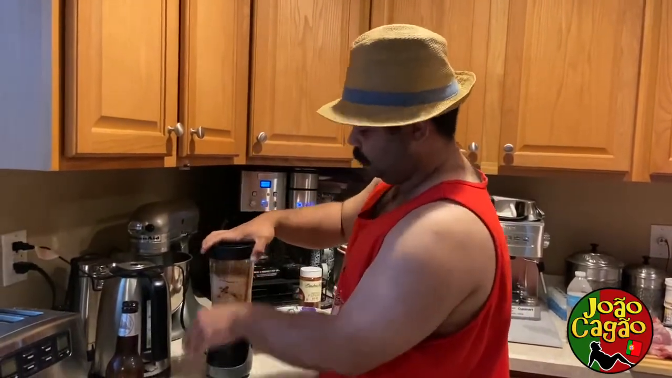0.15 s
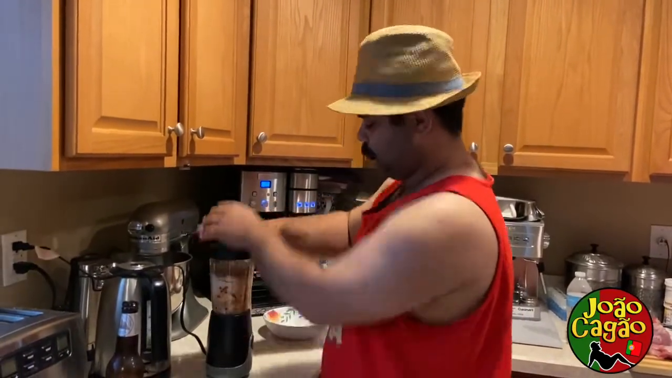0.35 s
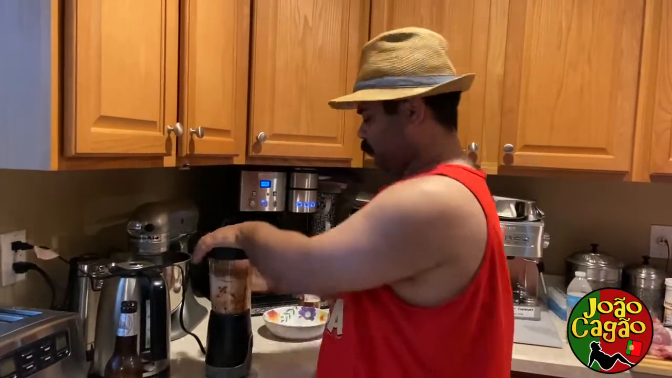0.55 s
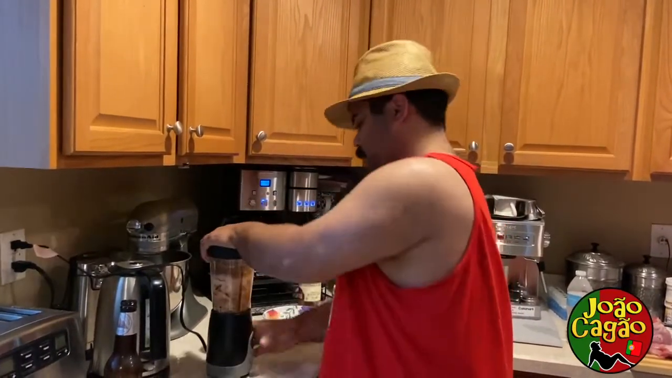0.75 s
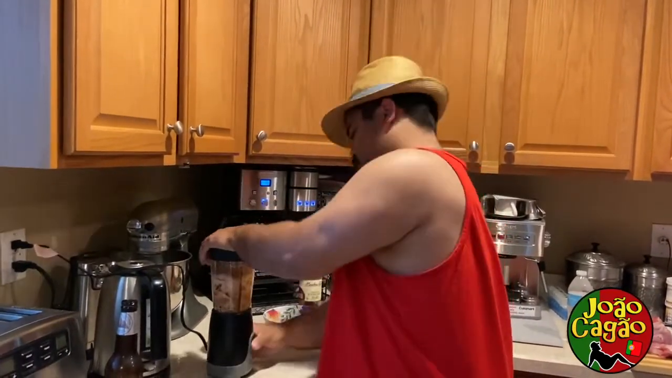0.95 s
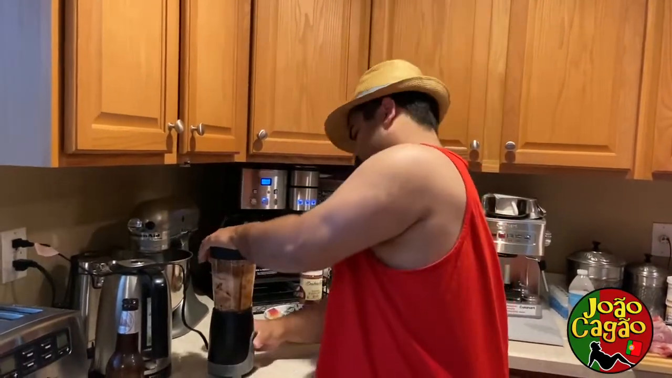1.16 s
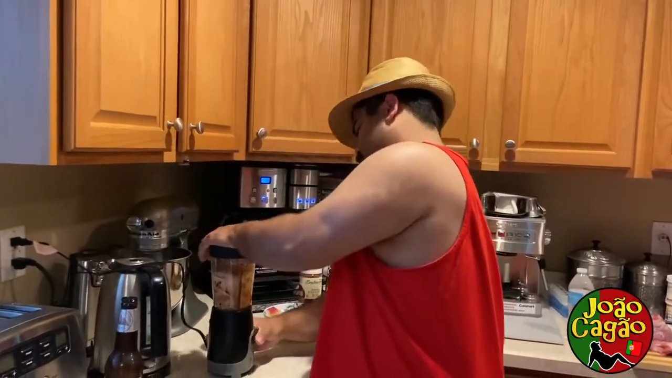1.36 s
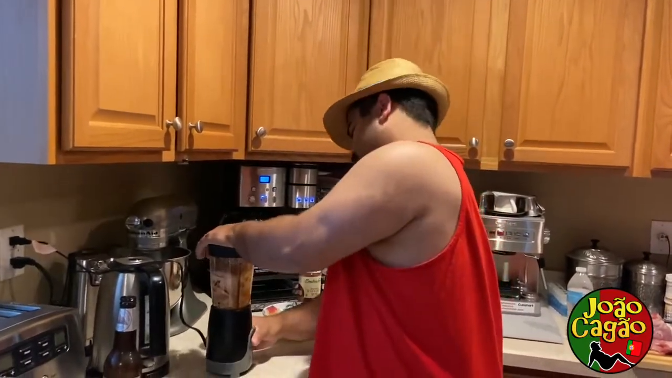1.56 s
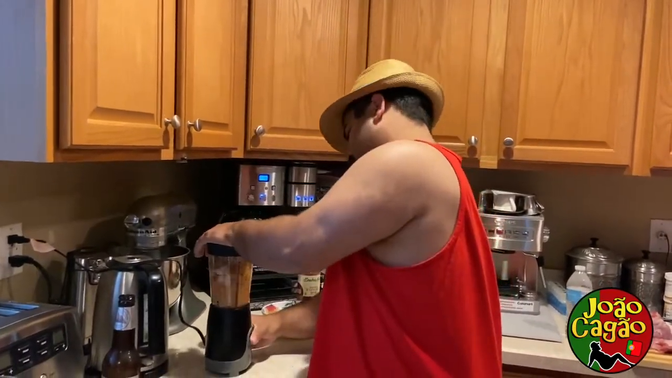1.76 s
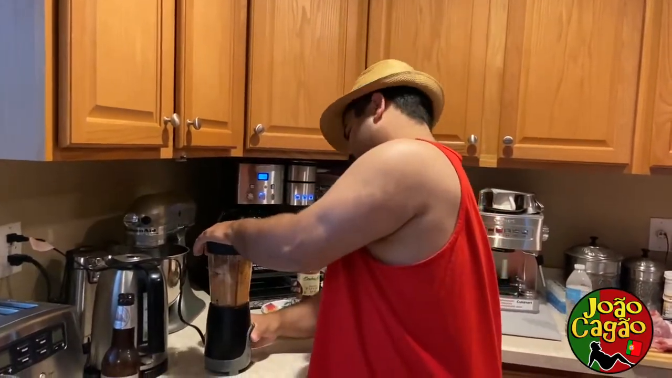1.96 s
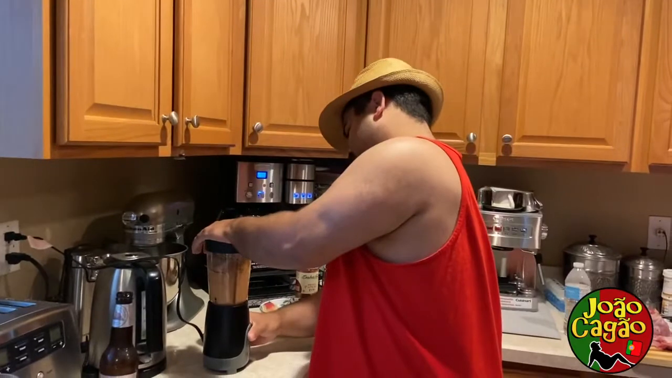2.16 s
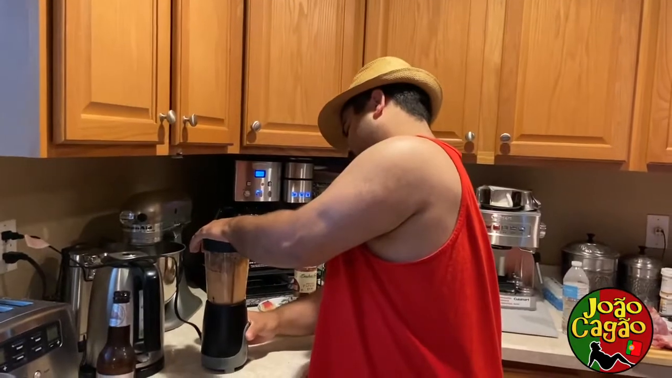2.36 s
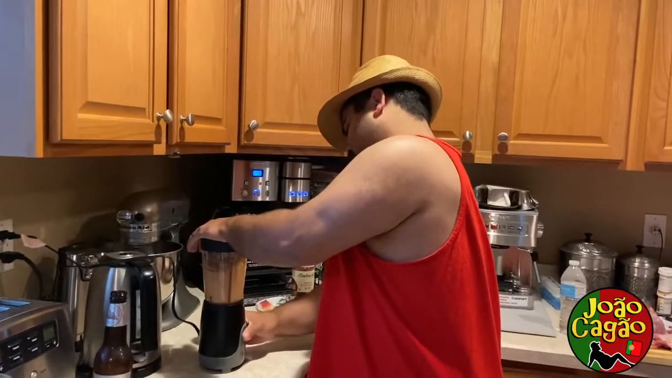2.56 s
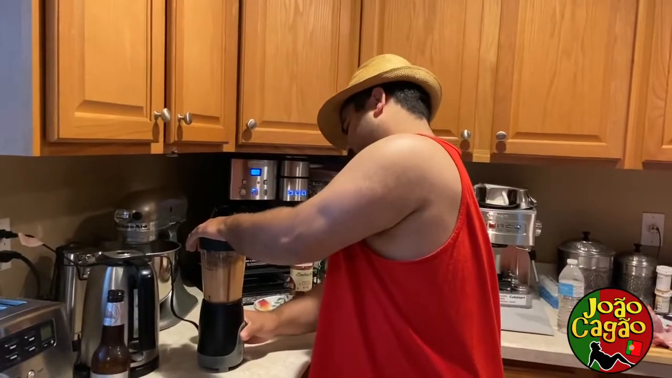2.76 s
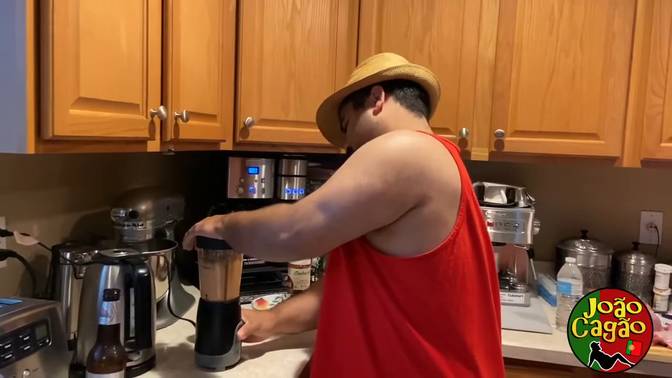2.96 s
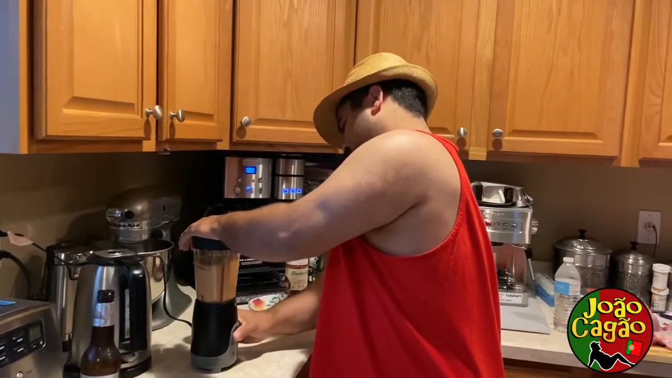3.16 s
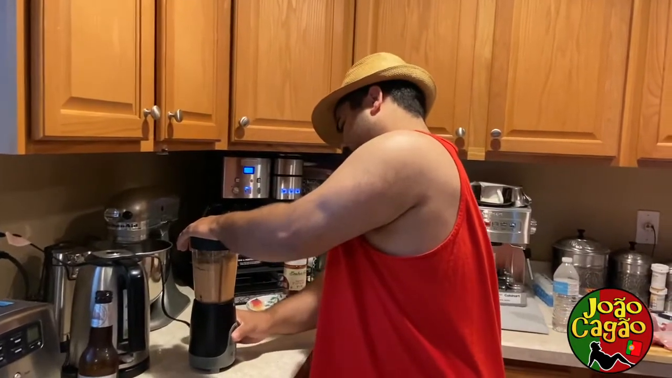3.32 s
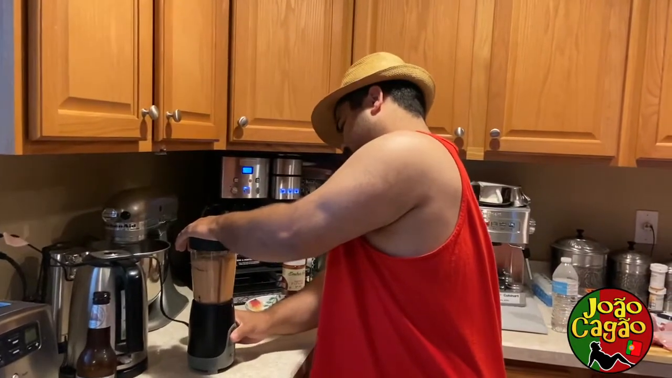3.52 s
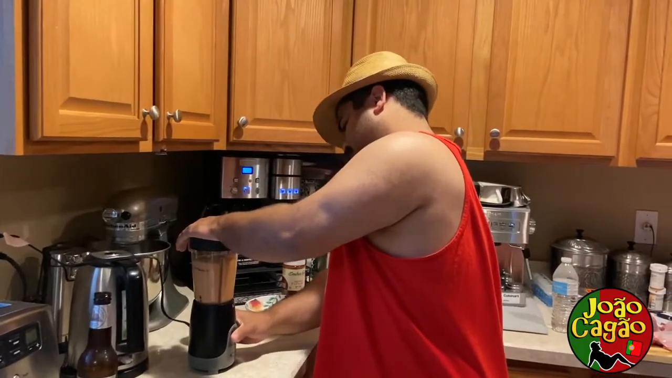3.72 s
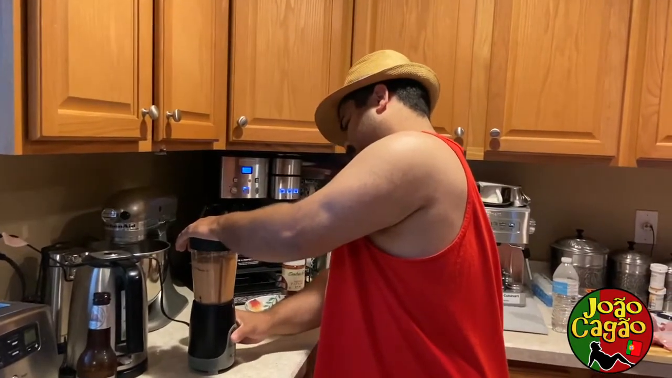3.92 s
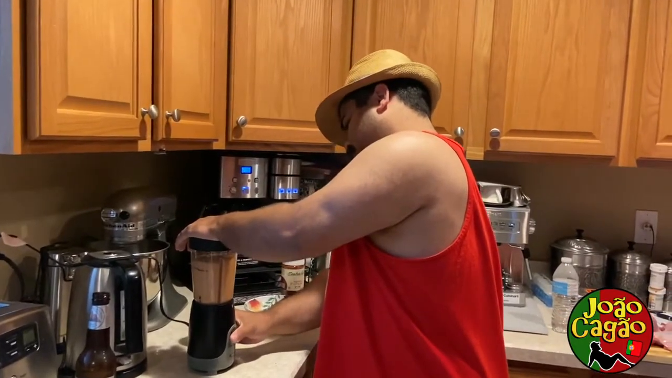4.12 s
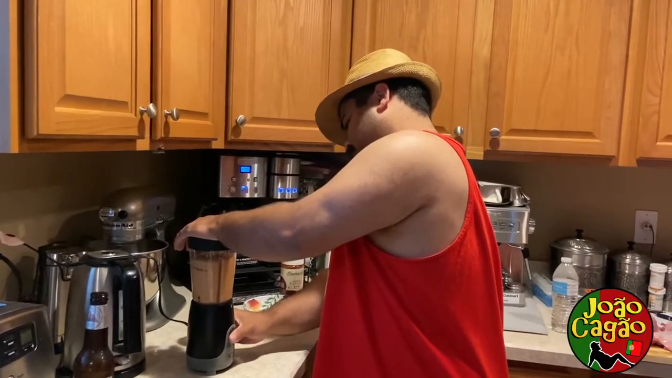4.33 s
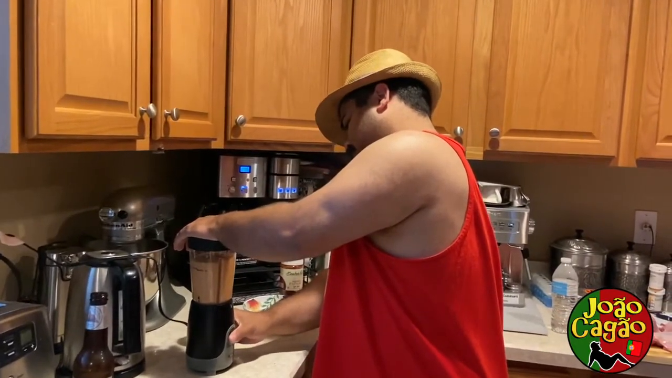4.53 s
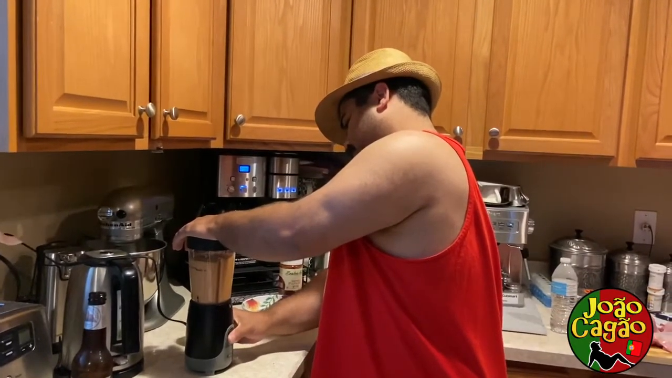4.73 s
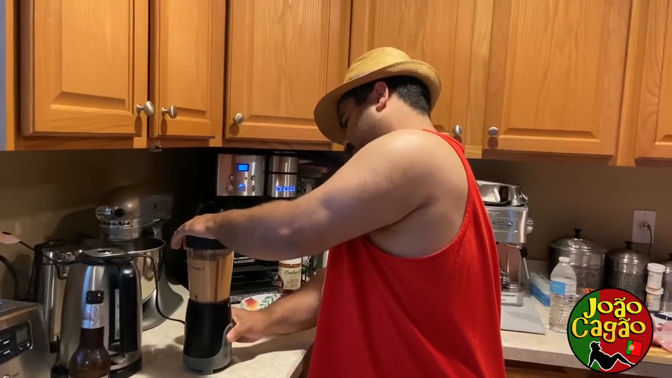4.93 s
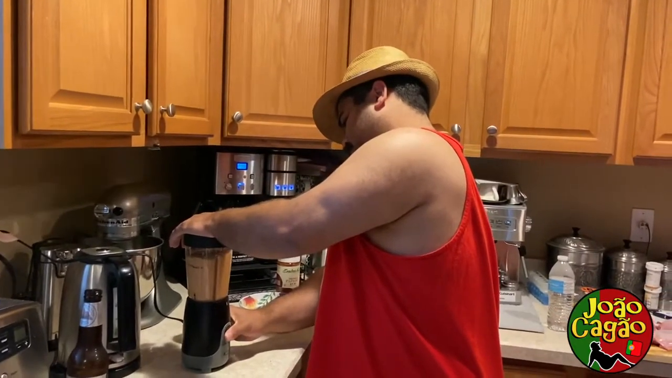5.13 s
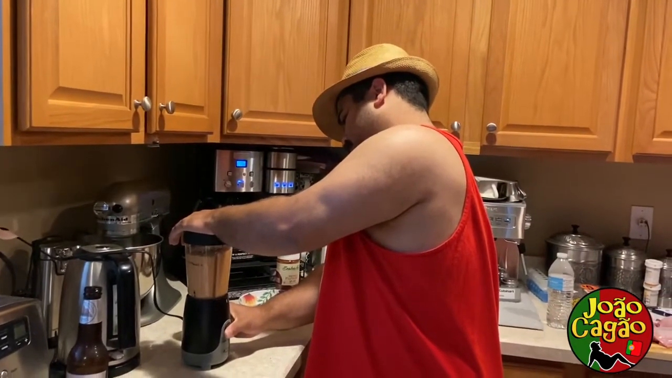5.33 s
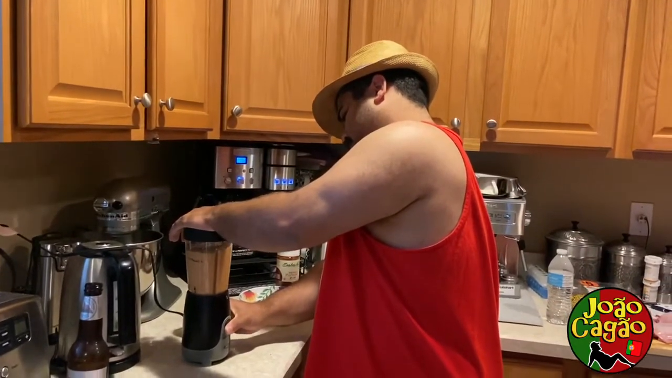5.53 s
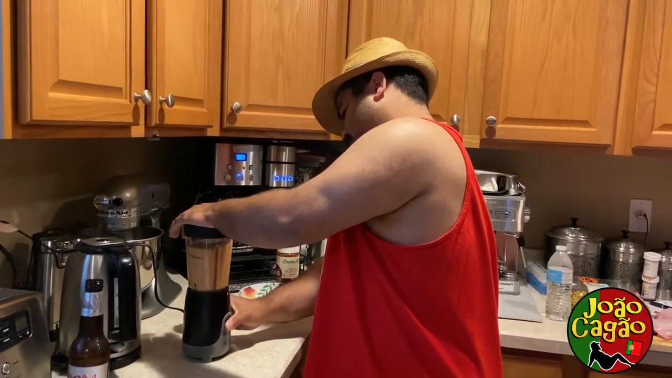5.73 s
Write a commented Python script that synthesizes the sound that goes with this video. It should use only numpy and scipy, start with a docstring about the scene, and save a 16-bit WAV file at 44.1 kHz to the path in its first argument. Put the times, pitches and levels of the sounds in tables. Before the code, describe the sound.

A plastic cup clicks onto a small blender, which blips once, then whines up and runs with a wavering roar.

```python
"""A kitchen, with a pair of microphone ports close to a small blender on the counter.
The plastic cup is tapped, twisted with a squeak and knocked onto its base. The motor blips once,
then spins up and runs, its speed sagging and rising with the load in the cup: shaft and fan sing,
brushes and bearings roar, cooling air hisses and the drink churns. A low room rumble lies behind."""
import sys
import numpy as np
from scipy import signal
from scipy.fft import rfft, irfft
from scipy.io import wavfile
from scipy.ndimage import uniform_filter1d

SR = 44100
rng = np.random.default_rng(int(sys.argv[2]) if len(sys.argv) > 2 else 0)


def file_out(sig):
    """Save sig as 16-bit WAV at sys.argv[1]."""
    # one column per channel
    cols = np.atleast_2d(sig).T
    # limit, then scale
    lim = np.clip(cols, -1, 1)
    pcm = np.round(lim * 32767).astype(np.int16)
    wavfile.write(sys.argv[1], SR, pcm)


N = 255030
TIME = np.arange(N) / SR
BLIP_ON_S, BLIP_OFF_S, RUN_S = 1.731, 1.86, 2.082  # a short contact, then the switch stays on


# The motor under load. Each row: time in seconds, shaft speed in Hz.
SHAFT_SPEED = [(2.09, 122.9), (2.14, 129), (2.19, 144.3), (2.23, 152.6), (2.32, 177.3), (2.39, 198.4),
               (2.44, 201.5), (2.6, 195.5), (2.77, 196.7), (2.84, 193.3), (2.99, 195.0), (3.13, 230.5),
               (3.21, 220.2), (3.31, 192.2), (3.39, 190.5), (3.44, 176.4), (3.55, 207.5), (3.59, 207.2),
               (3.64, 222.4), (3.7, 230), (4.19, 214.6), (4.29, 220.7), (4.39, 232.1), (4.47, 233.1),
               (4.95, 225.1), (5.13, 228.2), (5.27, 240.1), (5.35, 242), (5.5, 229.8), (5.78, 231.8)]
# The cup rocks every second turn. Each row: start and length in seconds, lift of half orders in dB.
CUP_ROCKS = [(3.64, 0.18, 7), (4.2, 0.065, 10.5), (4.341, 0.23, 12.5), (5.199, 0.308, 14.5),
             (5.55, 0.068, 7.5)]
def motor_tones():
    """The pitched sound of the run: shaft, shell, fan and mains hum."""
    gate, (hz,) = curves(SHAFT_SPEED)
    hz = hz * (1 + 0.0011 * drift(36))
    rock_db = spells(CUP_ROCKS, edge_s=0.023)
    return gate * (shaft(hz, rock_db) + shell_buzz(hz, rock_db) + fan(hz) + mains_hum(hz, rock_db))


# The low orders, as multiples of shaft speed, and their places at the microphone, left minus right in dB.
LOW_ORDERS = [.5, 1, 1.5, 2, 3]
ORDER_BALANCE = [-1, -2.5, -4.5, 5.5, 7]
# What base and counter pass on. Each row: pitch in Hz, level in dB.
BASE_RESPONSE = [(60, -52), (100, -29), (114, -29.5), (120, -21.5), (136, -16), (150, -26.5), (170, -27),
                 (195, -23), (215, -27), (227, -25.5), (234, -26.5), (238, -36), (243, -46), (290, -37),
                 (346, -24), (359, -33), (390, -30), (460, -32), (480, -33), (535, -37), (575, -35),
                 (597, -29.5), (650, -29.5), (686, -28.5), (698, -28), (720, -33.5)]
# Pieces jam the blades; orders two and three break off. Each row: start and length in seconds, drop in dB.
BLADE_JAMS = [(2.1, 0.32, 2.5), (2.57, 0.043, 0), (2.72, 0.093, 0.5), (3.18, .09, 8), (3.33, 0.18, 12),
              (4.65, .04, 9), (4.8, .04, 7), (5.2, 0.035, 2), (5.56, .04, 7)]
# The third order sings out. Each row: start and length in seconds, lift in dB.
THIRD_SWELLS = [(2.38, 0.2, 3), (4.46, .16, 2.5), (5.46, 0.11, 4.5), (5.68, .12, 3.5)]
HALF_ORDER_DB = -14  # while the cup sits still
def shaft(hz, rock_db):
    """The shaft jolts the base once a turn, so its orders start in step; rocking lifts the half orders."""
    onset_db = 80 * np.log10(run_up(rise_s=0.069) + 0.01)
    jam_db, sing_db = spells(BLADE_JAMS, edge_s=0.026), spells(THIRD_SWELLS, edge_s=0.04)
    out = 0
    for order, pan_db in zip(LOW_ORDERS, ORDER_BALANCE):
        db = np.repeat(lookup(BASE_RESPONSE, order * hz[::16]), 16)[:N] + onset_db
        if order % 1:
            db += HALF_ORDER_DB + rock_db
        elif order == 1:
            db -= 0.29 * rock_db  # rocking drains the first order
        else:
            db -= jam_db + 7 * unground() * abs(drift(27))
        db += (order == 3) * sing_db + 2.7 * drift(10) + 0.92 * drift(2.8)
        out += tone(order * hz, db, pan_db, turn=3 / 4)
    return out


def shell_buzz(hz, rock_db):
    """Higher shaft orders buzz through the plastic shell."""
    out = 0
    for order in [2.5, 3.5, 4, 4.5, 5, 6, 6.5, 7, 7.5, 8, 9, 12, 14, 16, 20, 26]:
        db = np.repeat(shell_colour(order * hz[::64]), 64)[:N] - 41
        if order % 1:
            db += HALF_ORDER_DB + 0.89 * rock_db
        out += tone(order * hz, db + 6.1 * drift(12), pan_db=4, turn=3 / 4)
    return out


# The tones of the ten vanes, as multiples of shaft speed.
VANE_ORDERS = [30, 40, 50]
# One row to a tone. Each row: level in dB when the duct sings, pitch blur in Hz.
VANE_TONES = [(-44, 50), (-39, 60), (-39, 95)]
DUCT_HZ, DUCT_WIDTH_HZ = 227.5, 8.5
def fan(hz):
    """The vanes sing in the air duct when the shaft speed nears DUCT_HZ."""
    duct_db = -9 * ((hz - DUCT_HZ) / DUCT_WIDTH_HZ) ** 4
    return sum(tone(order * hz + blur_hz * drift(137.5), duct_db + db + 1.6 * drift(60), pan_db=0)
               for order, (db, blur_hz) in zip(VANE_ORDERS, VANE_TONES))


# The field coil's hum. Each row: time in seconds, level in dB.
COIL_HUM = [(2.09, -35.5), (5.78, -36)]
HUM_HZ = 120  # the current peaks twice a mains cycle
def mains_hum(shaft_hz, rock_db):
    """The field coil hums, and its pull beats on the shaft's shake to make a sideband."""
    _, (db,) = curves(COIL_HUM)
    hum_dip_db = 0.45 * rock_db  # the hum is softer while the half orders sound
    hum = tone(np.full(N, HUM_HZ), db - hum_dip_db + 4.3 * drift(10), pan_db=0.59)
    return hum + tone(shaft_hz + HUM_HZ, db - 6, pan_db=0)


# Air and brushes, then the drink, heard close. Each row: frequency in Hz, relative level in dB.
HISS_SPECTRUM = [(3500, 5), (5000, 3.5), (6000, 0), (8000, -1.5), (10000, -1.5), (11500, -3.5), (13000, -1),
                 (16000, -8.5)]
CHURN_SPECTRUM = [(25, -55), (50, -12), (90, 0), (160, 1.5), (300, -2), (500, 2), (800, -1.5), (1300, -18)]
SIZZLE_HZ = 8800  # cooling air below, brush sizzle above
def motor_noise():
    """Brushes and bearings roar in the shell, cooling air hisses and the drink is thrown round the cup."""
    roar_gain, air_gain, churn_gain, sizzle_gain = run_gains() + blip_gains()
    throb = 1 + 0.048 * np.sin(2 * np.pi * HUM_HZ * TIME)
    lumps = drift(32)  # pieces meeting the blades
    roar = roar_gain * gain(0.59 * lumps) * noise(shell_colour, 1.8, size=2048, comb_db=5.5)
    treble = noise(band(HISS_SPECTRUM), 1.6, comb_db=2)
    air = signal.sosfilt(signal.butter(4, SIZZLE_HZ, "low", fs=SR, output="sos"), treble)
    sizzle = signal.sosfilt(signal.butter(4, SIZZLE_HZ, "high", fs=SR, output="sos"), treble)
    hiss = (air_gain * air + sizzle_gain * sizzle) * gain(0.8 * lumps)
    churn = churn_gain * gain(0.23 * lumps) * noise(band(CHURN_SPECTRUM), 1.85, size=2048, comb_db=2)
    return throb * (roar + hiss) + churn


# Roar, air, churn and sizzle in the run. Each row: rise in seconds, level in dB at free speed,
# dB per octave of speed, extra dB while the pieces are whole.
RUN_LEVELS = [(0.05, -26.5, 8, 7), (0.04, -29, 13, 0.5), (.08, -31.5, 1.5, 10.5), (0.03, -30.5, 3, 1.5)]
FREE_SPEED_HZ, GRIND_S = 227.3, 1
def run_gains():
    """The four noises follow the shaft's speed and ease as the pieces are ground down."""
    _, (hz,) = curves(SHAFT_SPEED)
    octaves = np.log2(hz / FREE_SPEED_HZ)
    return np.array([run_up(rise_s) ** 2 * gain(db + slope_db * octaves + pieces_db * unground())
                     for rise_s, db, slope_db, pieces_db in RUN_LEVELS])


def run_up(rise_s):
    """Rises from 0 to 1 as the run begins."""
    return np.clip((TIME - RUN_S) / rise_s, 0, 1)


def unground():
    """Share of the pieces that the blades have not yet ground down."""
    return np.exp(-np.maximum(TIME - RUN_S, 0) / GRIND_S)


# The same four in the blip. Each row: dB at contact before the jolt, dB at release, decay in dB a second.
BLIP_LEVELS = [(-29, -28.5, 173), (-47, -36.5, 203), (-30.5, -18.5, 167), (-40, -32, 198)]
JOLT_DB, JOLT_S = 5, 0.026
def blip_gains():
    """The shaft jerks loose at contact; the noise builds until release, then dies."""
    since_on, since_off = np.maximum(TIME - BLIP_ON_S, 0), np.maximum(TIME - BLIP_OFF_S, 0)
    built = np.minimum(since_on / (BLIP_OFF_S - BLIP_ON_S), 1) ** 2
    jolt = np.minimum(since_on / 0.003, 1) * gain(JOLT_DB * np.exp(-since_on / JOLT_S))
    return np.array([jolt * gain(on_db + (off_db - on_db) * built - decay * since_off)
                     for on_db, off_db, decay in BLIP_LEVELS])


# The motor's broad roar. Each row: frequency in Hz, relative level in dB.
ROAR_SPECTRUM = [(500, -14.5), (900, -0.5), (1250, -9.5), (1600, -7), (2300, -9), (3500, -5), (5000, -14.5),
                 (6500, -21.5)]
# The shell's resonances. Each row: frequency in Hz, width in Hz, relative level in dB.
SHELL_MODES = [(1113, 48, -6), (1597, 195, -1), (2026, 13, -3), (2728, 47, -4.5), (3137, 31, -5),
               (3670, 98, -7), (6010, 130, -0.5)]
def shell_colour(hz):
    """Colour in dB of what sounds through the motor's plastic shell."""
    modes = sum(4 * gain(db) ** 2 / (1 + (2 * (hz - centre) / width) ** 2)
                for centre, width, db in SHELL_MODES)
    return band(ROAR_SPECTRUM)(hz) + 10 * np.log10(0.21 + modes)


# The motor's kicks. Each row: time of the peak in seconds, level in dB.
MOTOR_KICKS = [(1.9, -21.5), (2.152, -54)]
# Their rumble in the counter. Each row: frequency in Hz, relative level in dB.
SHAKE_SPECTRUM = [(25, -41), (45, -34), (75, 15.5), (140, -14), (220, 6), (400, -33)]
RISE_DB_PER_S, FALL_DB_PER_S = 135, 184
def counter_shake():
    """The counter shakes as the motor kicks in."""
    kicks = sum(gain(db + np.minimum(RISE_DB_PER_S * (TIME - peak_s), FALL_DB_PER_S * (peak_s - TIME)))
                for peak_s, db in MOTOR_KICKS)
    return kicks * (TIME > BLIP_ON_S) * noise(band(SHAKE_SPECTRUM), 3.3, size=2048)


# Blows on cup and base, close to the microphone.
# Each row: start in seconds, crack and thud in relative dB, bright share from 0 to 1.
CUP_BLOWS = [(0.107, -60.5, -51, 0.8), (0.181, -66.5, -51, 0.1), (0.608, -55.5, -41, 0.25),
             (0.624, -51, -29, 0.02), (.725, -66, -40, 0.2), (.922, -45, -46, 0.45), (.93, -31, -34, 0.15),
             (.942, -28.5, -21.5, 0.13), (1.002, -53, -29, 0.2), (1.29, -66, -68, 0.02),
             (1.505, -62.5, -71, 0.07), (1.582, -63.5, -50, 1), (1.731, -22, -37, 0.7),
             (1.853, -32, -32, .45), (2.056, -56, -69, 0.6), (2.086, -39, -50, 0.3),
             (2.097, -34.5, -49, 0.1)]
# The counter's low modes. Each row: frequency in Hz, relative level in dB, seconds to fall 60 dB.
COUNTER_MODES = [(51.6, -36, 0.88), (75.8, -1.5, 0.38), (105.7, 7, 0.13), (148.6, 2, 0.14), (245, -7, 0.19),
                 (390, -22, 0.14), (576, -46.5, 0.028), (680, -16, 0.033)]
# The cup scrapes faintly. Each row: start and length in seconds, level in dB.
CUP_SCRAPES = [(0, 0.048, -75), (.25, 0.17, -73), (0.618, 0.35, -68), (1.26, .1, -80)]
# Dull plastic, then the bright snap of a latch or switch. Each row: frequency in Hz, relative level in dB.
DULL_SPECTRUM = [(180, 2), (350, 2.5), (800, -1.5), (1700, -9), (4000, -41), (8000, -39), (16000, -32)]
BRIGHT_SPECTRUM = [(800, -28), (1800, 0), (4000, -4), (8000, -11.5), (16000, -21)]
CRACK_S, TAIL_T60_S, SCRAPE_BRIGHT_SHARE = 0.0073, 0.35, 0.27
def cup_handling():
    """Each blow cracks, leaves a tail in the kitchen and rings the counter; friction adds the scrapes."""
    t = np.arange(SR // 2) / SR
    dull_power, bright_power, thud = np.zeros((3, N))
    tunings = 1 + 0.03 * rng.uniform(-1.9, 1, (len(CUP_BLOWS), len(COUNTER_MODES)))
    for (start_s, crack_db, thud_db, bright_share), tuning in zip(CUP_BLOWS, tunings):
        at = slice(round(start_s * SR), round(start_s * SR) + len(t))
        tail = gain(-4 - 10 * bright_share - 60 * t / TAIL_T60_S)
        envelope = (np.exp(-t / CRACK_S) + tail) * np.minimum(t / 0.0005, 1)
        power = (gain(crack_db) * envelope) ** 2
        dull_power[at] += 2.4 * power * (1 - bright_share)
        bright_power[at] += power * bright_share
        ring = sum(gain(db - 60 * t / t60_s) * np.sin(2 * np.pi * hz * ratio * t)
                   for (hz, db, t60_s), ratio in zip(COUNTER_MODES, tuning))
        thud[at] += gain(thud_db) * ring * (1 - np.exp(-t / 0.013))
    scrapes = spells([(start_s, length_s, gain(db)) for start_s, length_s, db in CUP_SCRAPES], 0.088)
    friction = (scrapes * gain(1.6 * drift(40))) ** 2
    dull = np.sqrt(dull_power + friction * (1 - SCRAPE_BRIGHT_SHARE)) * noise(band(DULL_SPECTRUM), 2.5)
    bright = np.sqrt(bright_power + friction * SCRAPE_BRIGHT_SHARE) * noise(band(BRIGHT_SPECTRUM), 2.4)
    return dull + bright + thud


# The twisted cup's squeak and thin whistle. Each row: time in seconds, pitch in Hz, level in dB.
CUP_SQUEAK = [(.782, 3465, -67), (.8, 3470, -56), (.92, 3465, -63)]
CUP_WHISTLE = [(.74, 10700, -86), (.82, 11800, -83), (.92, 12100, -72)]
def cup_twist():
    """Rubbing surfaces stick and slip at a wavering pitch."""
    out = 0
    for rows, wobble_hz, flutter_db in [(CUP_SQUEAK, 6, 4), (CUP_WHISTLE, 300, 5)]:
        gate, (hz, db) = curves(rows)
        out += gate * tone(hz + wobble_hz * drift(200), db + flutter_db * drift(130), pan_db=2.3)
    return out


# The kitchen behind the blender. Each row: frequency in Hz, relative level in dB.
ROOM_SPECTRUM = [(15, -50), (25, 6), (49, 2), (175, -8.5), (206, 0.5), (229, -9), (451, -22), (1370, -40.5),
                 (1740, -28), (1890, -43), (2690, -37), (3250, -40.5), (16000, -59.5)]
ROOM_DB = -55
def room_tone():
    """Appliances murmur, low and a little unsteady."""
    return gain(ROOM_DB + 2 * drift(6.7)) * noise(lambda hz: lookup(ROOM_SPECTRUM, hz), 2.3, size=2048)


# Left-right phase, stepping in the treble so the centre sounds hollow near 9 and 13 kHz.
# Each row: frequency in Hz, left minus right in half turns.
STEREO_PHASE = [(0, 0), (300, 0), (1640, .4), (3270, .15), (7600, 0), (8700, -.97), (9300, -1.03),
                (10500, -1.95), (11900, -2.05), (12800, -2.97), (13800, -3.03), (14500, -3.9), (16600, -4)]
def stereo_phase(hz):
    """Left minus right phase in radians."""
    return np.pi * np.interp(hz, *np.transpose(STEREO_PHASE))


def tone(hz, db, pan_db, turn=None):
    """A gliding stereo sine, starting at a given or random part of a turn."""
    angle = 2 * np.pi * (np.cumsum(hz) / SR + (rng.random() if turn is None else turn))
    level = np.repeat(gain(db[::16]), 16)[:N]
    shift = np.repeat(stereo_phase(hz[::16]), 16)[:N]
    return np.sqrt(2) * level * gain([[pan_db / 2], [-pan_db / 2]]) * np.sin([angle, angle - shift])


# How alike the ports hear noise. Each row: frequency in Hz, likeness from 0 to 1.
PORT_LIKENESS = [(25, 0.39), (60, 1), (130, 0.92), (290, 0.85), (640, 0.28), (1400, 0.6), (3100, .55),
                 (6000, 0.34), (7500, 1), (16000, 1)]
# Where noise sits between them. Each row: frequency in Hz, left minus right in dB.
PORT_BALANCE = [(60, -1), (110, 2.5), (200, -1), (380, -4), (700, 1.5), (1290, -2), (2380, 2.5),
                (4400, 3.5), (8120, -1.5), (15000, 0.5)]
def noise(spectrum_db, patchy_db, size=1024, comb_db=0):
    """Coloured stereo noise with drifting louder and softer patches; rms 1."""
    frames, hz = 4 * N // size + 5, np.fft.rfftfreq(size, 1 / SR)
    re, im, other_re, other_im, patches = rng.standard_normal((frames, len(hz), 5), dtype=np.float32).T
    patches = unit_rms(uniform_filter1d(uniform_filter1d(patches, size=8, axis=0), size=12, axis=1))
    likeness = lookup(PORT_LIKENESS, hz)[:, None]
    left = re + 1j * im
    right = likeness * left + np.sqrt(1 - likeness ** 2) * (other_re + 1j * other_im)
    right *= np.exp(-1j * stereo_phase(hz))[:, None]
    side_db = lookup(PORT_BALANCE, hz)[:, None] / 2
    # standing waves lift some pitches and sink others, less so in the treble
    comb = np.clip(rng.standard_normal((len(hz), 1)), -2, 1.5) / (1 + (hz[:, None] / 5000) ** 2)
    db = spectrum_db(hz)[:, None] + patchy_db * patches + comb_db * comb
    spectra = np.array([left * gain(db + side_db), right * gain(db - side_db)])
    return unit_rms(signal.istft(spectra, nperseg=size, noverlap=size * 3 // 4)[1][:, :N])


def drift(hz):
    """Random wander at rates up to about hz; rms 1."""
    steps = N // 64 + 2
    spectrum = rfft(rng.standard_normal(steps)) / (1 + (np.fft.rfftfreq(steps, 64 / SR) / hz) ** 4)
    return np.interp(np.arange(N) / 64, np.arange(steps), unit_rms(irfft(spectrum, steps)))


def curves(rows):
    """A gate that is open while a timed table lasts, and its columns at every sample."""
    times, *columns = np.transpose(rows)
    gate = np.clip(np.minimum(TIME - times[0], times[-1] + 0.02 - TIME) / 0.004, 0, 1)
    return gate, [np.interp(TIME, times, column) for column in columns]


def spells(rows, edge_s):
    """A sum of plateaus with sloped edges."""
    return sum(height * np.clip(np.minimum(TIME - start_s, start_s + length_s - TIME) / edge_s + 0.5, 0, 1)
               for start_s, length_s, height in rows)


def band(points):
    """A spectrum in dB, as a function of Hz, that falls 18 dB an octave outside its table."""
    def spectrum_db(hz):
        octaves_outside = np.log2((hz + 1) / np.clip(hz + 1, points[0][0], points[-1][0]))
        return lookup(points, hz) - 18 * abs(octaves_outside)
    return spectrum_db


def lookup(points, hz):
    """Reads a table on a log-frequency axis."""
    table_hz, values = np.transpose(points)
    return np.interp(np.log(hz + 1), np.log(table_hz + 1), values)


def gain(db):
    """Decibels to amplitude."""
    return 10 ** (np.asarray(db) / 20)


def unit_rms(x):
    """Scales to rms 1."""
    return x / np.sqrt(np.mean(x ** 2) + 1e-20)


def scene():
    """The kitchen, the cup and the blender together."""
    return room_tone() + cup_twist() + cup_handling() + motor_tones() + motor_noise() + counter_shake()


LOW_CUT_HZ, HIGH_CUT_HZ = 40, 15720
def record(dry):
    """The microphone loses the deepest bass, and a steep band limit takes off the top treble."""
    thinned = signal.sosfilt(signal.butter(3, LOW_CUT_HZ, "high", fs=SR, output="sos"), dry)
    band_limit = signal.firwin(1023, HIGH_CUT_HZ, window=("kaiser", 9), fs=SR)
    return signal.oaconvolve(thinned, band_limit[None], "same")


dry = scene()
out = record(dry)
file_out(out)
```